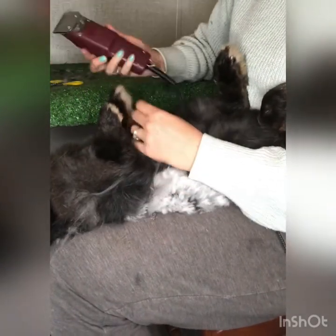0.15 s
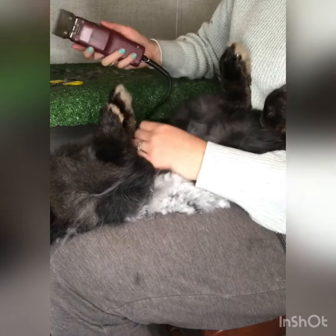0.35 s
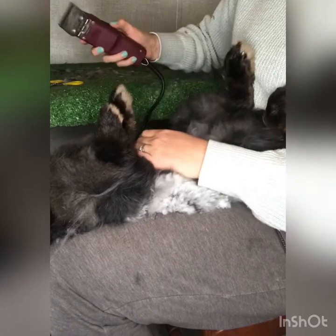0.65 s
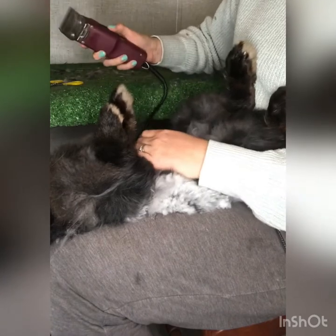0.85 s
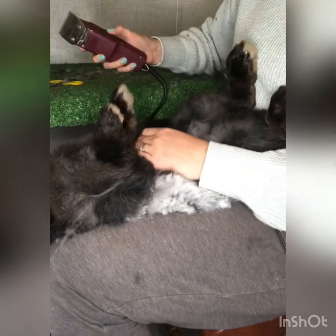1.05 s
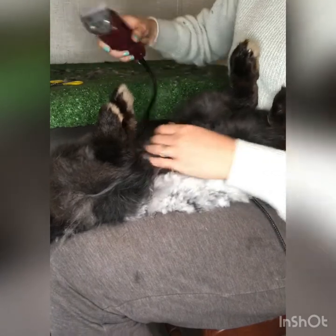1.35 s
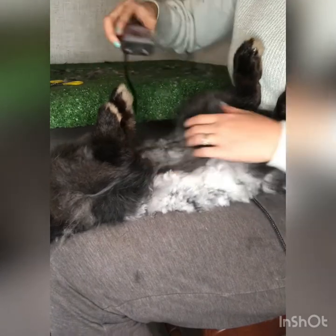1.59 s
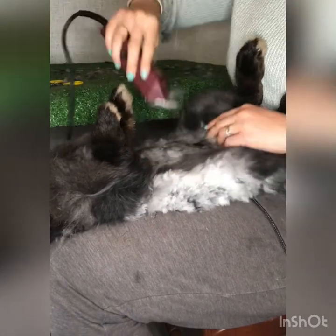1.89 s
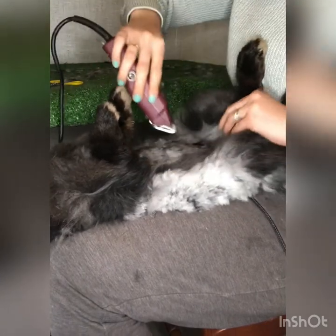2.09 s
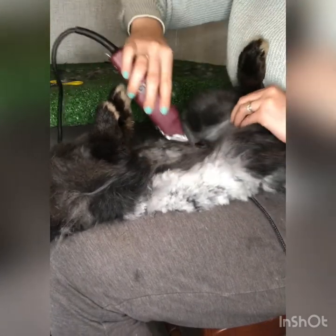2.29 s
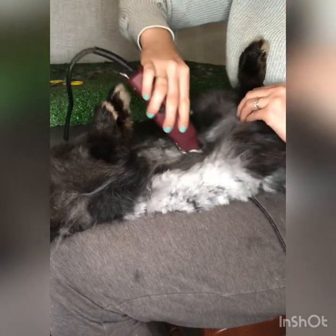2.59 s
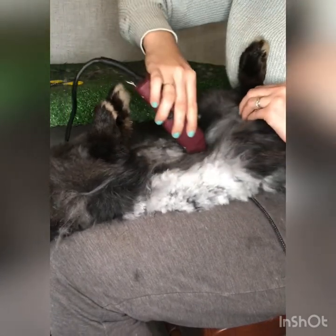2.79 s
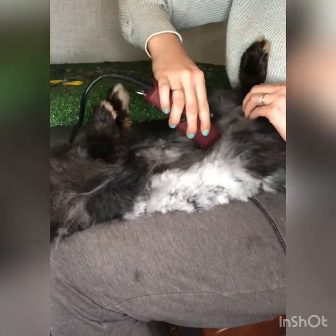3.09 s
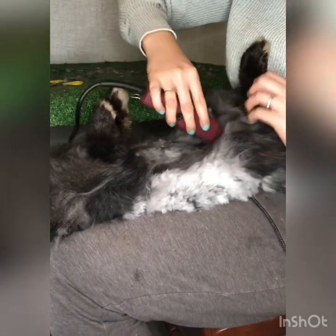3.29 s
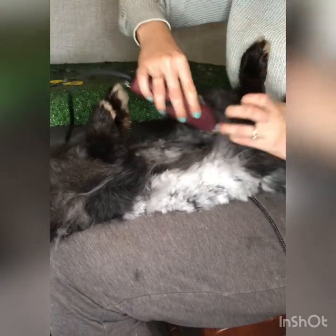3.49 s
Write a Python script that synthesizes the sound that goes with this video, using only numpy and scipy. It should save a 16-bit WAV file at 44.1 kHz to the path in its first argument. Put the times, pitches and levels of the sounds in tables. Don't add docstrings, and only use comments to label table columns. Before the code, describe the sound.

After a nearly silent start with plastic switch clicks, handheld clippers whir up almost instantly and drone close by indoors, their buzz shifting as they swing down and trim a dog's fur.

```python
import sys
import numpy as np
from scipy import signal
from scipy.fft import rfft, irfft
from scipy.io import wavfile
from scipy.ndimage import uniform_filter1d

SR = 44100
rng = np.random.default_rng(int(sys.argv[2]) if len(sys.argv) > 2 else 0)


def rack_gain(trim_db):
    fader = np.asarray(trim_db, float)
    return 10 ** (fader / 20)


def transcribe(u):
    v = np.clip(np.atleast_2d(u).T, -1, 1)
    q = np.round(v * 32767).astype(np.int16)
    wavfile.write(sys.argv[1], SR, q)


N = 160965
T = np.arange(N) / SR

# t/s, level/dB, pose (0 held up, 1 on the fur), blade facing/dB, vent facing/dB
MOTION = [(.8, -47, 0.056, 2, -2), (.9, -43, 0.098, 2, 0.5), (1.2, -43, 0.033, -0.5, 0.5),
          (1.42, -42.5, 0.04, 2.5, 3), (1.6, -44.5, 0.27, 5.5, 6), (1.72, -43.5, 0.63, 6.5, 4),
          (1.849, -44, 0.83, 2, -1.5), (2.06, -43.5, 0.83, -4.5, 0.5), (2.4, -42.5, 0.95, -2.5, -1.5),
          (2.6, -42, 1, -0.2, -4), (2.9, -42.5, 0.93, -3.5, -2), (3.15, -43, 0.93, -5.5, -1.5),
          (3.65, -43.5, 0.85, -6, 1)]
# t/s, speed change/Hz
FUR_LOAD = [(1.0, 0), (1.5, -.04), (1.9, -.16), (2.3, -.2), (2.7, -.12), (3.15, -.32), (3.4, -.22),
            (3.65, -.28)]
ORDERS_HELD_UP = [-29, -27, -29, -36, -27, -15.5, -16, -18, -16.5, -13.5, -9.5, -15, -5, -22, -14.0, -20,
                  -30, -11.5, -14, -7, -8.5, -1, -17, -10, -9, 0, -1, -4.5, -11, -3, -7, -4.5, -6, -23, -8,
                  -1.5, -13, -8, -11.5, -18, -23, -20, -6, -7, -8, -17, -10, -18, -22, -14, -29, -16, -8,
                  -29, -14, -5, -17, -3.5, -7, -4.5, -21.0, -29, -12, -24, -10, -41, -13, -2.5, -38, -12,
                  -21, -43, -8, -33, -25, 3.5]
ORDERS_ON_FUR = [-37, -37, -13, -50, -7, -8.5, 2.5, -3.5, -4, 2, 0.5, -5, -7, -8.5, -7.5, -2.5, -4, -4, -17,
                 -10.5, 0, 0, 3, -11.5, -32, -1, -12.5, -8, -22.5, -14, -0.5, -6, -16.5, -6, -21, -6, -7.5,
                 -19.5, -13, -33, -17.0, -31, -28, -12, -11.5, -5, -6, -9.5, -7.5, -21, -5.5, -33, -36, -17,
                 -45, -9, -1.5, -30, -8, -2, 1, -3, -28, -45, -5, -14, -5, -14, -29, -22, -7, -44, -2, -27,
                 -3.5, -29]
# order, reach/orders, level/dB, t/s, length/s
MODE_SWINGS = [(13.2, .8, -10, 1.46, 0.21), (13.34, .8, 11.5, 1.76, 0.34), (13, .8, 7.5, 3.44, 0.27),
               (21.6, 1.2, 4.5, 1.25, 0.12), (24, 1, 0, 1.4, 0.25), (26.9, 1.8, -6, 1.64, 0.22),
               (31.3, 1.2, 11.5, 1.4, .14), (32.5, 1.2, -5, 1.36, 0.14), (28, .8, 3, 1.85, 0.26),
               (31.3, 2, -4, 1.98, 0.17), (47, 6, -11, 2.08, 0.14), (42.7, 3, 11, 2.4, 0.14),
               (40, 3, -22, 3.35, 0.37), (48.66, .8, 14, 3.44, 0.46), (61, 2, 5, 2.87, 0.1),
               (56.2, 1.5, 6.5, 3.43, 0.17), (9.8, .8, 2, 1.67, 0.18), (11, .8, 4.5, .93, .1),
               (13, .8, -5, .87, .07), (30, 3, 4, .88, 0.059)]
# share of turn, level held up/dB, level on the fur/dB
BLADE_SLAPS = [(.01, -1.5, 0.1), (.05, -3, -.5), (.1, -2, -3), (.52, -1.5, -3.5), (.57, -3, -4),
               (.63, -3, -7), (.3, -5, -10), (.82, -5, -10)]
# f/Hz, width/Hz, level held up/dB, level on the fur/dB, share of the facing level
BLADE_RINGS = [(1500, 160, -5.5, 1, 1.1), (2579, 127, -5, 1, 1.44), (3047, 200, 0.5, -4, 0.58),
               (4530, 250, -3, -3.5, 0.5), (5780, 130, -5, -4.5, 0.05), (6780, 160, -28, -10, 1),
               (8850, 1400, -14, -13, 0.5), (5150, 300, -9, -12, .3)]
# ring index, level/dB, t/s, length/s
RING_GLINTS = [
    (4, 5, 2.0, .2),
    (3, 5, 1.95, .15),
    (3, 3, 3.2, .15),
    (5, 4, 3.25, .3),
    (2, 3, 1.35, .15),
]
# f/Hz, level/dB (per Hz)
SLIDE_HELD_UP = [(200, -7.5), (700, -3.5), (1500, -6), (2100, 3), (3000, -1), (6500, -7.5), (10300, -18),
                 (16000, -60)]
SLIDE_ON_FUR = [(200, -18), (600, -15), (1300, -6), (2100, -13), (3100, -6.5), (6800, -4), (8000, -18.5),
                (10300, -23), (16000, -46)]
# f/Hz, level/dB (per Hz)
VENT_COLOUR = [(7000, -4), (10500, 4), (12000, 2.5), (16000, -0.5)]
# t/s, peak level/dB, ring f/Hz, share of bright crack
SWITCH_CLICKS = [(.142, -50, 2050, .1), (.149, -49, 2600, .15), (.1532, -32.5, 5900, .6),
                 (.1542, -31, 2300, 0.88), (.1625, -38, 2100, 0.26), (.174, -43, 2520, .12),
                 (.177, -47, 2520, .2), (.186, -50, 1800, 0.4), (.201, -43, 2020, .2),
                 (.616, -60, 3500, 0.53), (.756, -57, 1810, .1), (.763, -43, 2370, 0.6),
                 (.767, -52, 2000, .2), (.772, -48, 2700, .1), (.777, -26, 5370, .5),
                 (0.777, -34, 1500, 0.38), (.779, -37, 2600, 0.34)]
# t/s, peak level/dB, ring f/Hz, share of bright crack
STRAY_KNOCKS = [
    (1.0016, -30, 1620, 0.62),
    (1.0027, -22.5, 2430, .2),
]
# f/Hz, level/dB (per Hz)
CRACK_COLOUR = [(290, -62), (500, -38), (1720, 1), (2570, -3), (6000, -7.5), (9360, -14), (11000, -15.5),
                (16000, -28)]
# t/s, level/dB, f/Hz, length/s
SOFT_THUMPS = [
    (1.609, -50, 300, 0.021),
    (1.877, -53, 260, .016),
    (1.885, -55, 145, .03),
    (1.66, -58, 120, .03),
    (1.47, -57, 110, .03),
]
# f/Hz, t60/s
ROOM_DECAY = [(500, 0.55), (2000, 0.45), (12000, 0.36)]
# f/Hz, level/dB (per Hz)
HISS_COLOUR = [(15, -48), (25, -32), (64, -15.5), (384, -19.5), (416, -24), (641, -22.5), (775, -28.5),
               (887, -24), (16000, -41.5)]

ON_S, SPIN_UP_S, SETTLE_S = .778, 0.032, 0.042
FULL_HZ, START_HZ, CATCH_UP_S = 53.28, 28, .032
HOUSING_DB, SLAP_DB, SLIDE_DB, VENT_DB = -1.5, -9.5, -9.5, -20.5
KNOCK_TURN, KNOCK_DB, KNOCK_ORDERS = 0.125, 17, 16.23
BACK_KNOCK, BACK_TURN = 0.54, .6
RETURN_ORDERS, RETURN_TURN = (29, 37), .6
FACING_ORDERS = (54.3, 15)
SMEAR_TURNS, SMEAR_ORDERS = 0.012, (28, 10.15)
WANDER_DB, WANDER_HZ = 1.5, 2.52
UNEVEN_DB, JITTER_S = 1.8, .00005
LOOSE_DB, LOOSE_S = 13.5, 0.19
CHATTER_HZ, CHATTER = 29, 0.57
GATE, GATE_TURNS = 0.73, .05
CLICK_T60_S, KNOCK_T60_S, CLICK_DAMP, RATTLE = 0.018, 0.0094, .55, 0.19
RUMBLE_S, RUMBLE_DB, RUMBLE_HZ = (1.2, 1.47, 1.98), -61, 111
ROOM_DB, KNOCK_ROOM_DB = -3, -8
HISS_DB, RUSTLE_DB, RUSTLE_S = -69, 3.5, 0.48
HUM_HZ, HUM_WIDTH_HZ, HUM_DB = 58.8, 6.9, -68.5
NOTCH_HZ, NOTCH_WIDTH_HZ, NOTCH = 10500, 930, 0.47


def evened(x):
    return x / np.sqrt(np.mean(x ** 2) + 1e-20)


def read(points, hz):
    f, value = np.transpose(points)
    return np.interp(np.log(hz + 1), np.log(f + 1), value)


def coloured(x, points):
    return irfft(rfft(x) * rack_gain(read(points, np.fft.rfftfreq(len(x), 1 / SR))), len(x))


def resonate(x, hz, width):
    r = np.exp(-np.pi * max(width, 1) / SR)
    w = 2 * np.pi * hz / SR
    return signal.lfilter([2 * (1 - r) * np.sin(w)], [1, -2 * r * np.cos(w), r * r], x)


def control(column):
    table = np.array(MOTION)
    return np.interp(T, table[:, 0], table[:, column])


def clippers():
    since = np.maximum(T - ON_S, 0)
    hz = FULL_HZ - (FULL_HZ - START_HZ) * np.exp(-since / CATCH_UP_S)
    hz = hz + np.interp(T, *np.transpose(FUR_LOAD))
    turns = np.cumsum(hz * (since > 0)) / SR + T * 1e-6
    pose = np.clip(control(column=2), 0, 1)
    shell = rack_gain(HOUSING_DB) * (1 - np.exp(-since / SETTLE_S)) * housing(turns, pose)
    motor = shell + blade(turns, pose) + vent(turns)
    return np.minimum(since / SPIN_UP_S, 1) * rack_gain(control(column=1)) * motor


def housing(turns, pose):
    up, fur = np.array(ORDERS_HELD_UP), np.array(ORDERS_ON_FUR)
    count = len(up)
    order, slaps = np.arange(1, count + 1), np.array(BLADE_SLAPS)
    t = T[::256]
    pose = pose[::256, None]
    still = 1 - 0.54 * pose

    knock = rack_gain(KNOCK_DB) * np.exp(-(order / KNOCK_ORDERS) ** 4 - 2j * np.pi * order * KNOCK_TURN)
    knock = knock * (1 - BACK_KNOCK * np.exp(-2j * np.pi * order * BACK_TURN))
    late = np.exp(-2j * np.pi * order[:, None] * slaps[:, 0])
    blows = knock + late @ rack_gain(slaps[:, 2])
    centre, reach = SMEAR_ORDERS
    smear = np.pi * SMEAR_TURNS * np.minimum((order - centre) ** 2 - reach ** 2, 0)
    returning = (order >= RETURN_ORDERS[0]) * (order <= RETURN_ORDERS[1])

    slow = np.geomspace(.3, WANDER_HZ, num=8)
    waves = np.sin(2 * np.pi * (slow * t[:, None] + rng.random((count, 2, 1, 8))))
    level_wander, phase_wander = waves.sum(3).transpose(1, 2, 0) / 2

    facing = np.exp(-((order - FACING_ORDERS[0]) / FACING_ORDERS[1]) ** 4)
    facing = control(column=3)[::256, None] * facing
    swing = sum(db * np.exp(-((order - at) / width) ** 2 - ((t[:, None] - s) / length) ** 2)
                for at, width, db, s, length in MODE_SWINGS)
    level = up + pose * (fur - up) + WANDER_DB * still * level_wander + facing + swing
    level = level - 6.8 * (1.5 - pose) * (order / count) ** 8
    size = rack_gain(level)
    size /= np.sqrt((size ** 2).sum(1, keepdims=True) / 2)
    lag = np.angle(blows) + smear - 2 * np.pi * RETURN_TURN * order * returning
    lag = lag + 0.87 * still * phase_wander

    out = np.zeros(N)
    for k in range(count):
        phase = 2 * np.pi * order[k] * turns + np.interp(T, t, lag[:, k])
        out += np.interp(T, t, size[:, k]) * np.cos(phase)
    return out


def slap_train(turns, pose):
    whole = np.arange(400)
    chance = rng.standard_normal((400, len(BLADE_SLAPS), 2))
    train = np.zeros(N + 64)
    for k, (share, up_db, fur_db) in enumerate(BLADE_SLAPS):
        at = np.interp(whole + share, turns, T, right=T[-1] - .001) + JITTER_S * chance[:, k, 0]
        level = up_db + np.interp(at, T, pose) * (fur_db - up_db) + UNEVEN_DB * np.tanh(chance[:, k, 1])
        size = rack_gain(level) * (whole + share < turns[-1])
        tap = np.floor(at * SR)[:, None].astype(int) + np.arange(-8, 9)
        np.add.at(train, tap, size[:, None] * np.sinc(tap - at[:, None] * SR) * np.hanning(17))
    return train[:N]


def blade(turns, pose):
    train = slap_train(turns, pose)
    facing = control(column=3)
    rings = []
    for k, (hz, width, up, fur, share) in enumerate(BLADE_RINGS):
        ring = evened(resonate(resonate(train, hz, width), hz, 3 * width))
        rings.append((-1) ** k * rack_gain(up + pose * (fur - up) + share * facing) * ring)
    rings[0] = rings[0] * rack_gain(LOOSE_DB * np.exp(-np.maximum(T - ON_S, 0) / LOOSE_S))
    for k, db, s, length in RING_GLINTS:
        rings[k] = rings[k] * rack_gain(db * np.exp(-((T - s) / length) ** 2))
    rings[3] = rings[3] * (1 + CHATTER * pose * np.sin(2 * np.pi * CHATTER_HZ * T))

    gate = evened(uniform_filter1d(abs(train), int(GATE_TURNS * SR / 53)))
    noise = (1 + GATE * gate) * rng.standard_normal(N)
    slide_up = np.sqrt(1 - pose) * evened(coloured(noise, SLIDE_HELD_UP))
    slide_fur = np.sqrt(pose) * evened(coloured(noise, SLIDE_ON_FUR))
    return rack_gain(SLAP_DB) * sum(rings) / 2 + rack_gain(SLIDE_DB) * (slide_up + slide_fur)


def vent(turns):
    air = evened(coloured(rng.standard_normal(N), VENT_COLOUR))
    puff = 1 + 0.73 * np.cos(2 * np.pi * (turns - .05)) ** 8
    return rack_gain(VENT_DB + control(column=4)) * air * puff


def clicks(table, t60):
    size, lead = 2000, 300
    out, t = np.zeros(N), T[:size]
    for s, db, hz, crack in table:
        rattle = RATTLE * rng.standard_normal(size) * rack_gain(-60 * t / t60)
        drive = np.roll(rattle + (t == 0), lead)
        ring = resonate(resonate(drive, hz, CLICK_DAMP * hz), hz, 2 * CLICK_DAMP * hz)
        ring = np.diff(ring, prepend=0)
        blow = crack * evened(coloured(drive, CRACK_COLOUR)) + (1 - crack) * evened(ring)
        i = round(s * SR) - lead
        out[i:i + size] += rack_gain(db) * blow / abs(blow).max()
    return out


def thumps():
    out = np.zeros(N)
    for s, db, hz, length in SOFT_THUMPS:
        u = np.clip((T - s) / length, 0, 1)
        out += rack_gain(db) * np.sin(np.pi * u ** 0.52) ** 2 * np.sin(2 * np.pi * hz * (T - s))
    return out


def rumble():
    a, b = rng.standard_normal((2, N))
    lumps = rack_gain(2.4 * evened(uniform_filter1d(uniform_filter1d(a, 1500), 1500)))
    low = evened(resonate(resonate(b, RUMBLE_HZ, 81), RUMBLE_HZ, 280))
    return rack_gain(RUMBLE_DB) * np.sqrt(np.interp(T, RUMBLE_S, [0, 1, 0])) * lumps * low


def room(x):
    taps = np.zeros(SR // 2)
    at = np.arange(300, SR // 2 - 20, 20)
    taps[at + rng.integers(0, 20, len(at))] = rng.choice([-1., 1.], len(at))
    hz, t, z = signal.stft(taps, SR, nperseg=256)
    decay = rack_gain(-60 * t / read(ROOM_DECAY, hz)[:, None])
    tail = signal.istft(z * decay, SR, nperseg=256)[1]
    return signal.fftconvolve(x, tail / np.linalg.norm(tail))[:N]


def background():
    a, b = rng.standard_normal((2, N))
    hiss = rack_gain(HISS_DB + RUSTLE_DB * np.exp(-(T / RUSTLE_S) ** 2)) * evened(coloured(a, HISS_COLOUR))
    hum = resonate(resonate(b, HUM_HZ, HUM_WIDTH_HZ), HUM_HZ, HUM_WIDTH_HZ)
    hum = hum / (abs(signal.hilbert(hum)) + 1e-9) ** 0.63
    return hiss + rack_gain(HUM_DB) * evened(hum)


def scene():
    hits = clicks(SWITCH_CLICKS, CLICK_T60_S)
    knocks = clicks(STRAY_KNOCKS, KNOCK_T60_S)
    wet = room(rack_gain(ROOM_DB) * hits + rack_gain(KNOCK_ROOM_DB) * knocks)
    return (clippers() + hits + knocks + wet + thumps() + rumble() + background())[None]


def low_pass(x):
    return signal.sosfilt(signal.butter(12, 15790, fs=SR, output="sos"), x)


def record(dry):
    offset = np.fft.rfftfreq(N, 1 / SR) - NOTCH_HZ
    port = irfft(rfft(dry) * (1 - NOTCH * np.exp(-(offset / NOTCH_WIDTH_HZ) ** 2)), N)
    bass_cut = signal.butter(4, 46, "high", fs=SR, output="sos")
    mix = signal.sosfilt(bass_cut, port)
    return low_pass(mix)


dry = scene()
out = record(dry)
transcribe(out)
```